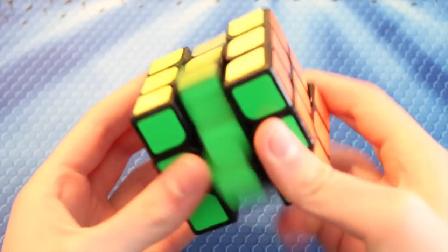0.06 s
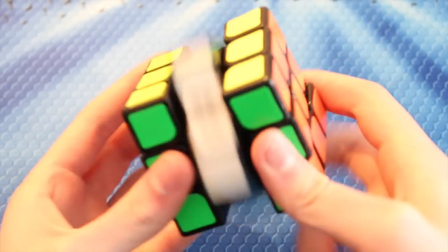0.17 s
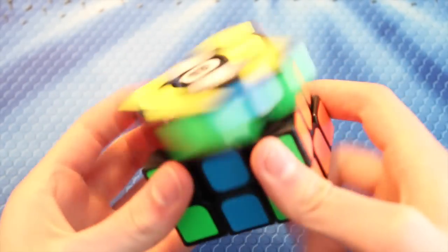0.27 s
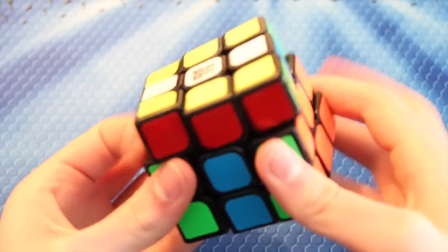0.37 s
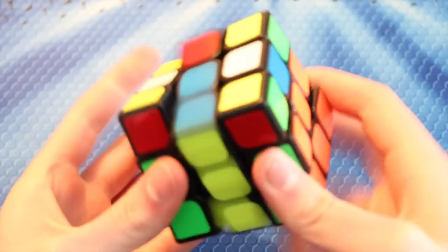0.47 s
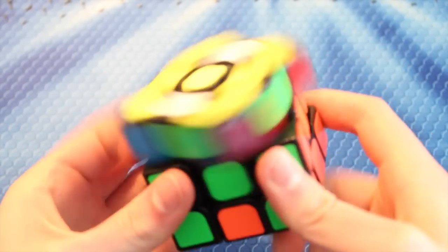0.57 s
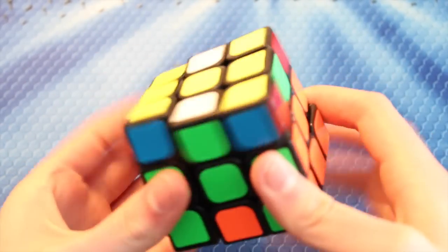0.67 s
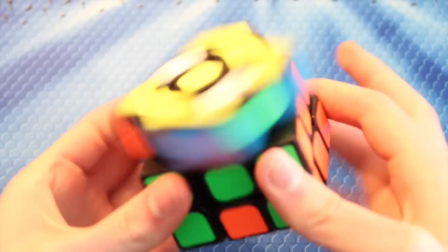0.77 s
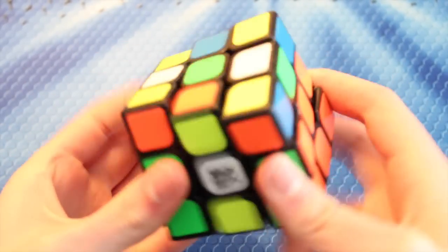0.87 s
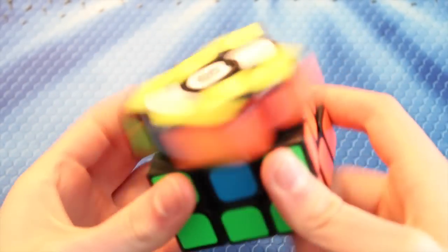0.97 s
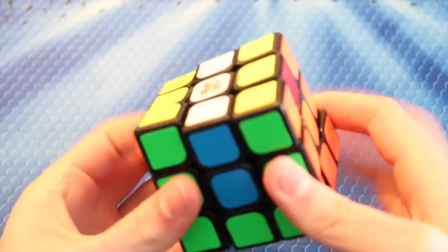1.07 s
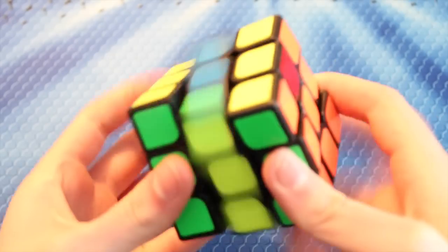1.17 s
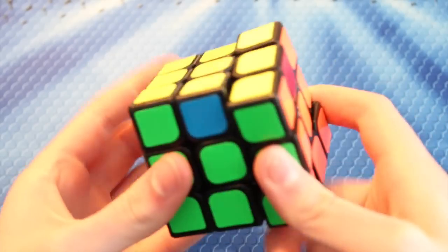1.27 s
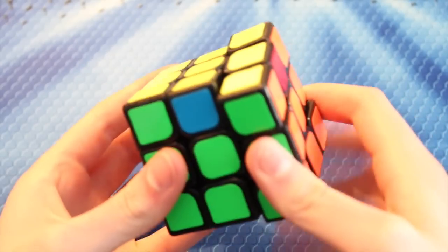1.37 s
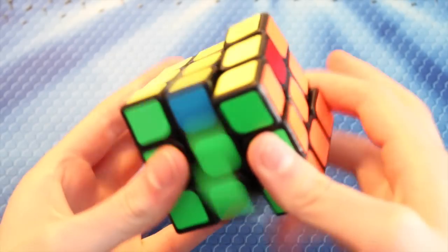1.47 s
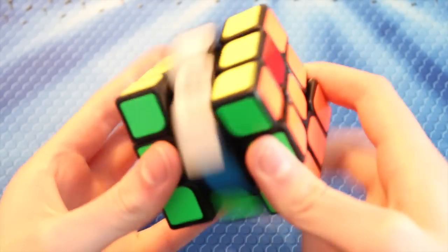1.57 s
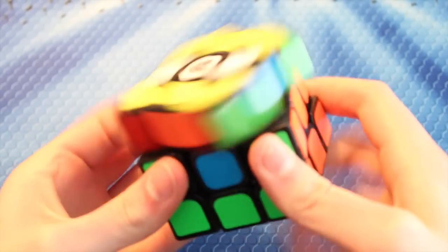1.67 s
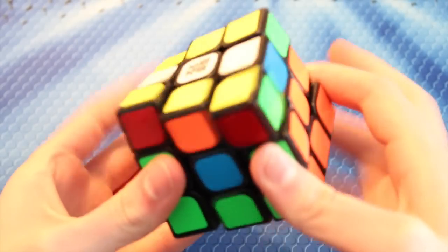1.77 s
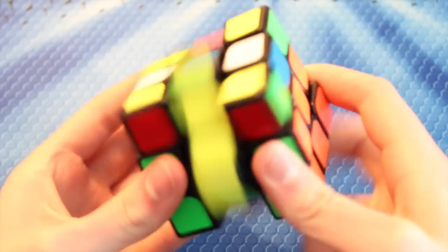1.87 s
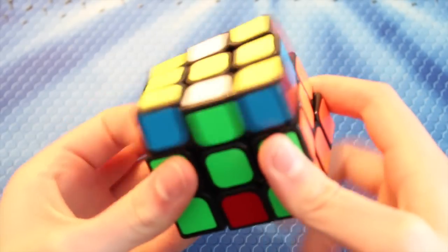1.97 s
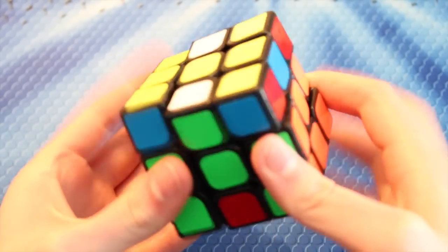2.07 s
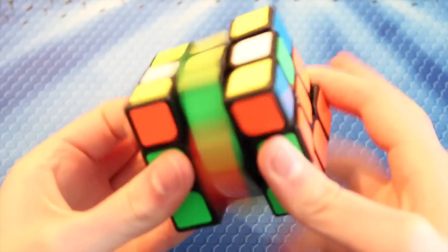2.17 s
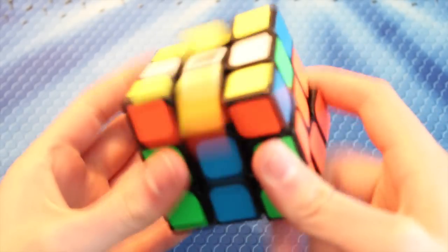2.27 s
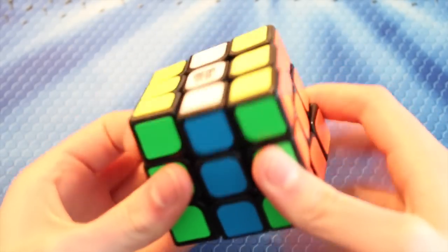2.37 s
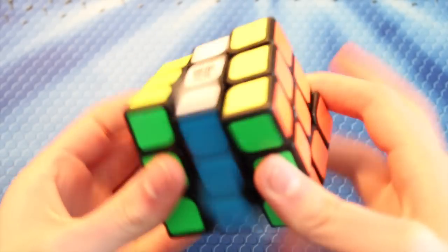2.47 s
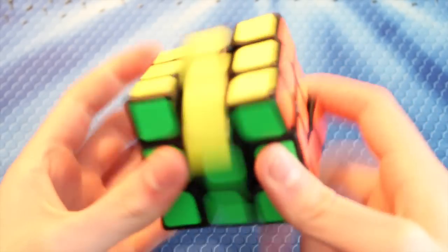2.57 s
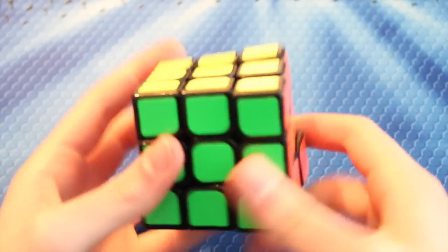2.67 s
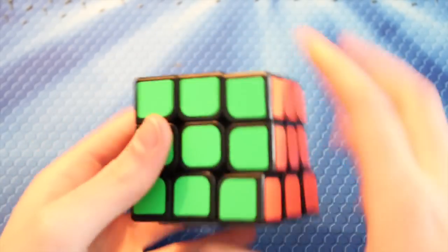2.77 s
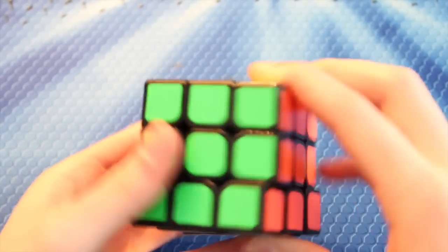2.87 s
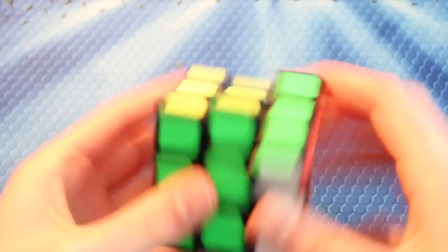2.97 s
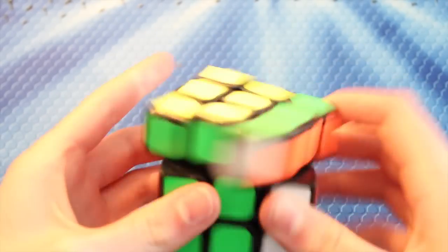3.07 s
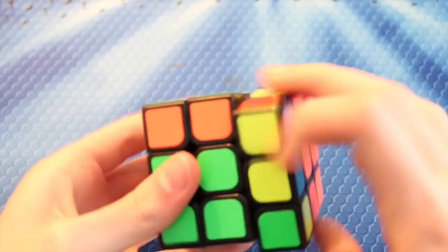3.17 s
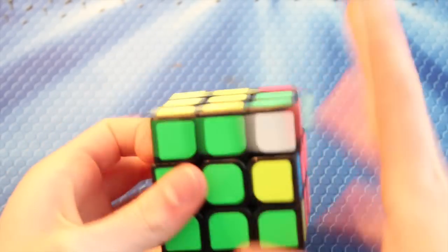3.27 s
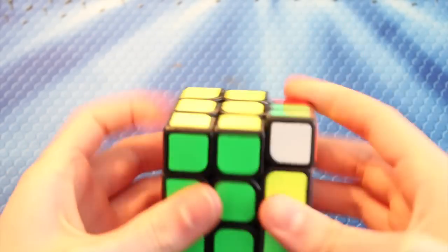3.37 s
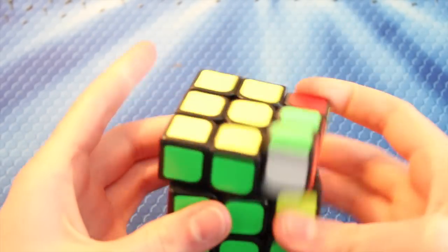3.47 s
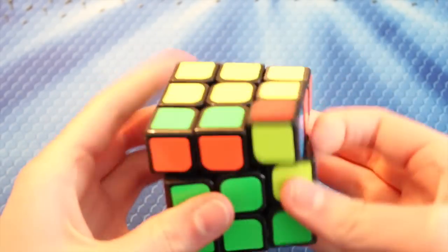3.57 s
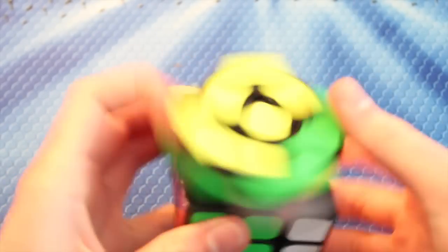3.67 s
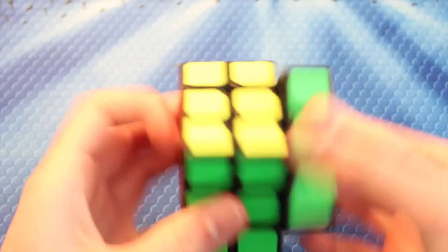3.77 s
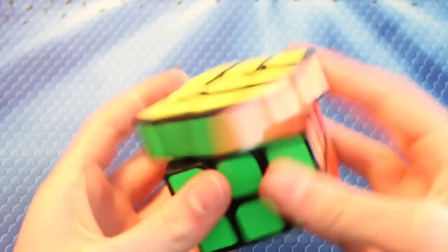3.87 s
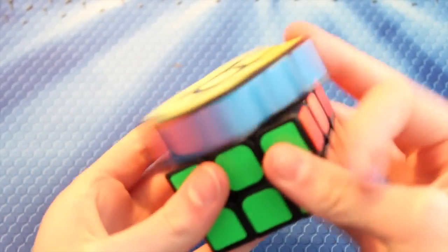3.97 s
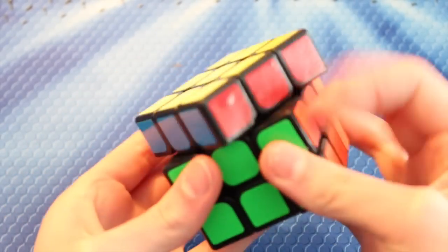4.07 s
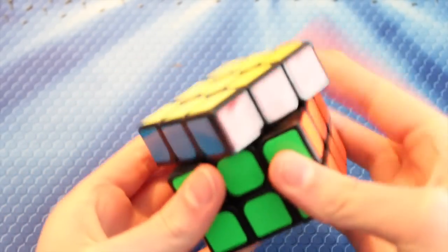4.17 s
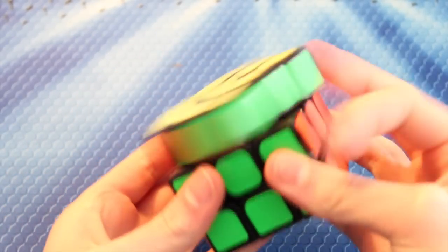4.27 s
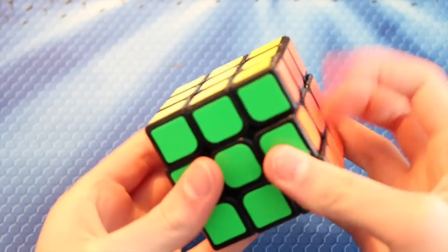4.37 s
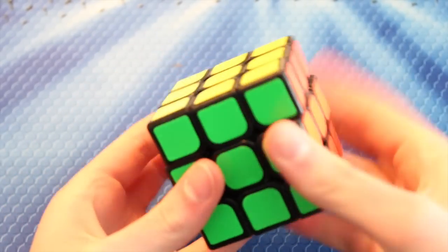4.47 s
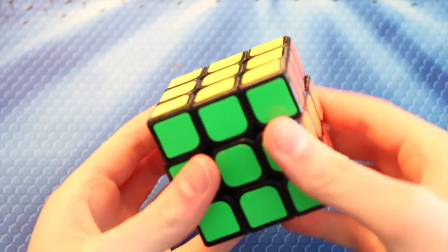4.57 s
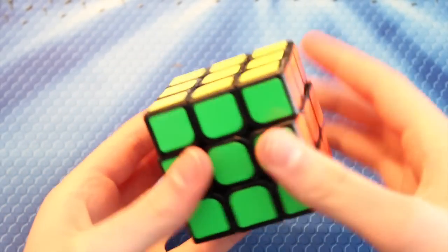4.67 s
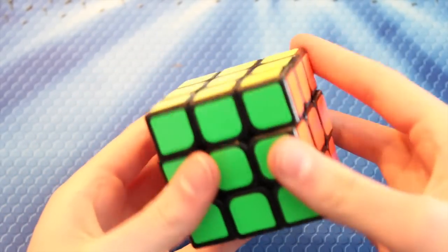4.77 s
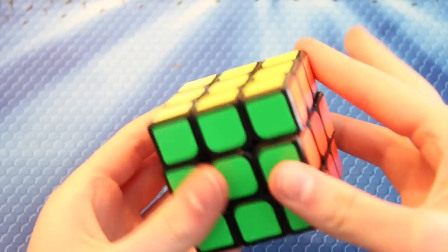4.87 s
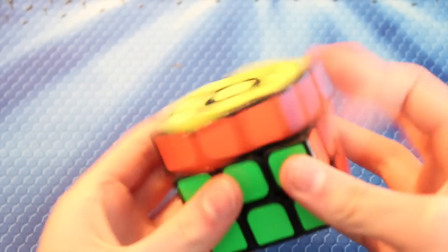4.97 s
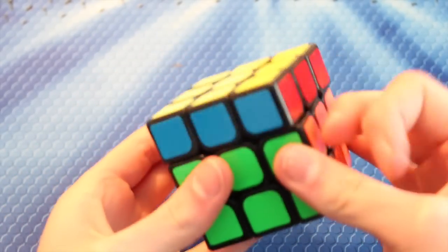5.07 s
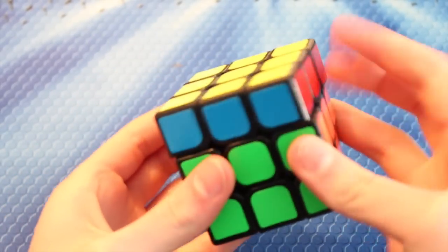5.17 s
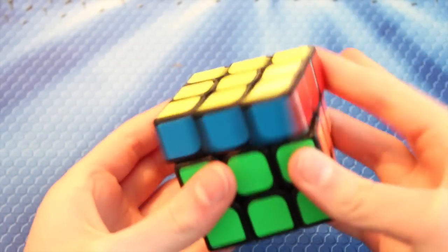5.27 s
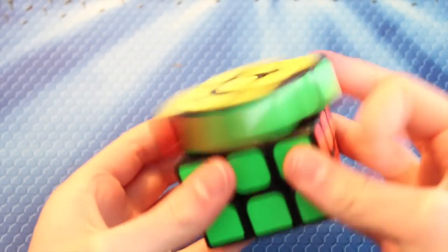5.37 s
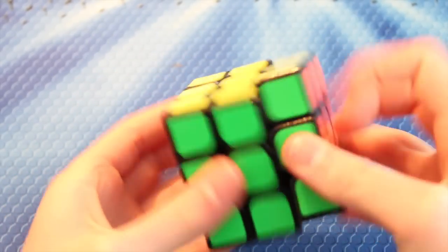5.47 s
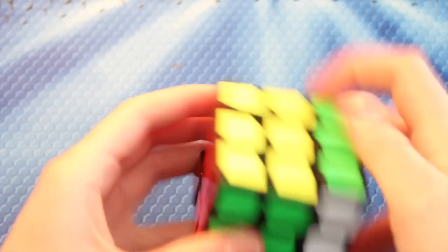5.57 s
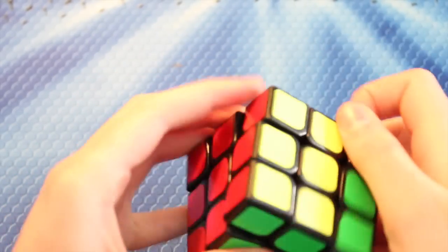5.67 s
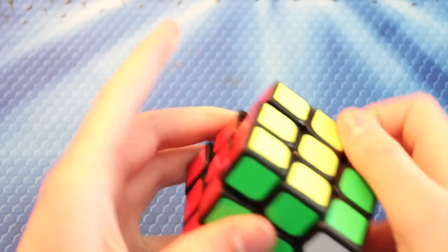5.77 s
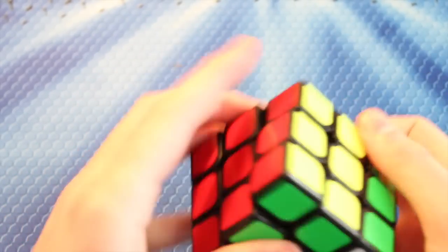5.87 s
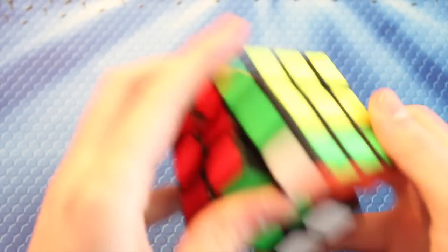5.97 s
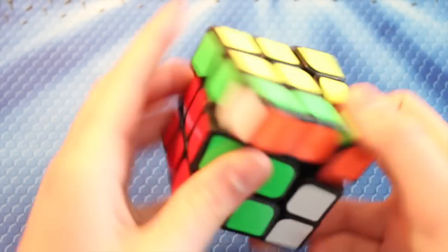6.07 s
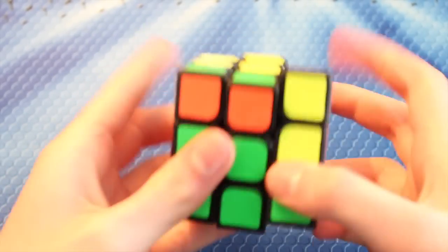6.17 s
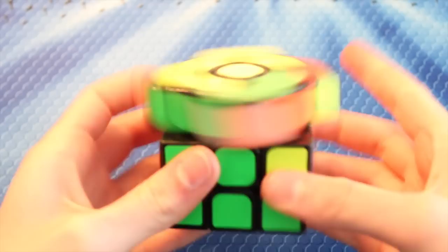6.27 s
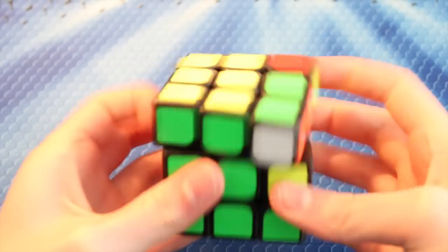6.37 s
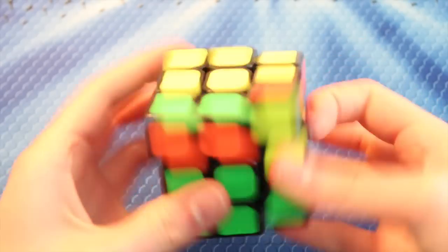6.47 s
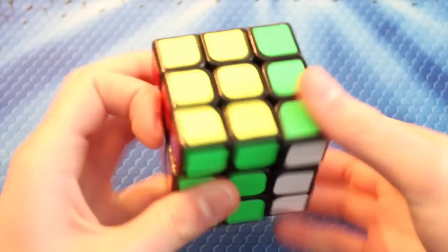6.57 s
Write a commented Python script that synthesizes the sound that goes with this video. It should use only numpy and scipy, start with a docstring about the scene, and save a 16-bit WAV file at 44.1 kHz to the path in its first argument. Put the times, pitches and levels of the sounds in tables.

```python
"""A faint hiss and a low rumble fill a small room. Almost at once, two hands start turning a plastic
puzzle cube close by, in quick runs. With each push the layers grind over each other, then pieces catch
and snap home in clusters of knocks. The hollow cube colours both sounds, and hands, table and walls
throw back a brief tail. After about 4.5 seconds the hands pause for half a second, then turn some more."""
import sys
import numpy as np
from scipy import signal
from scipy.fft import rfft, irfft
from scipy.io import wavfile
from scipy.ndimage import uniform_filter1d, minimum_filter1d

SR = 44100
rng = np.random.default_rng(int(sys.argv[2]) if len(sys.argv) > 2 else 0)


def persist_wave(psi):
    """Save psi, clipped to +-1, as 16-bit WAV."""
    counts = np.round(np.clip(psi, -1, 1) * 32767).astype(np.int16)
    wavfile.write(sys.argv[1], SR, np.atleast_2d(counts).T)


N = 292383


def amp(db):
    """Turn decibels into a gain."""
    return 10 ** (np.asarray(db) / 20)


def unit_level(x):
    """Scale a signal to an average (rms) level of 1."""
    return x / np.sqrt(np.mean(x ** 2) + 1e-20)


def curve_at(points, hz):
    """Join points with straight lines, with frequency spaced in octaves."""
    f, value = np.transpose(points)
    return np.interp(np.log(hz + 1), np.log(f + 1), value)


def gain_over_time(points):
    """A gain that glides between points given in seconds and dB."""
    return amp(np.interp(np.arange(N) / SR, *np.transpose(points)))


# The tone of the hiss. Each row: frequency in Hz, relative level in dB.
HISS_TONE = [(25, -32), (45, -9.5), (60, -2), (80, -8), (150, -5), (350, -8), (670, -5.5), (1000, -5.5),
             (4400, -14), (8000, -14), (14400, -25), (16000, -30.5)]
# The hiss grows a little as the turning calms. Each row: time in seconds, level change in dB.
HISS_SWELL = [(4.2, -0.5), (4.6, 0.5)]


def hiss(level_db=-68, uneven_db=1.2):
    """Steady room and microphone noise, slightly patchy in time and pitch."""
    frames, hz = N // 256 + 5, np.fft.rfftfreq(1024, 1 / SR)
    real, imag, patches = rng.standard_normal((frames, 513, 3)).T
    patches = unit_level(uniform_filter1d(uniform_filter1d(patches, 10, axis=0), 16, axis=1))
    spectrum = (real + 1j * imag) * amp(curve_at(HISS_TONE, hz)[:, None] + uneven_db * patches)
    noise = signal.istft(spectrum, nperseg=1024, noverlap=768)[1][:N]
    return amp(level_db) * unit_level(noise) * gain_over_time(HISS_SWELL)


# How loud the house murmurs. Each row: time in seconds, level in dB.
RUMBLE_LEVELS = [(0., -72), (1.3, -91.5), (2.2, -89.5), (3.0, -73.5), (3.5, -93), (4.3, -84), (4.7, -75),
                 (5.7, -72), (6.1, -74.5), (6.63, -81)]


def rumble(band_hz=(125, 274)):
    """The house murmurs: low noise whose level drifts."""
    band = signal.butter(2, band_hz, "bandpass", fs=SR, output="sos")
    return unit_level(signal.sosfilt(band, rng.standard_normal(N))) * gain_over_time(RUMBLE_LEVELS)


# Finger pushes on a layer, and near 2.82 s a finger brushing lightly over the cube. Each row: start in seconds,
# rise in seconds, hold in seconds, level in dB, then the low boom and the bright edge, both in dB compared with
# the cube's body band.
PUSHES = [(.04,0.036,.005,-69,-20,-6),(0.155,0.0085,.02,-42,-9,-14),(0.181,0.018,0.025,-29,-3.5,-6),(0.24,0.018,0.023,-31,-5,-8),(0.275,0.014,.01,-28,-7.5,-7),(0.342,0.012,.04,-45,-2,-15.5),(0.372,.022,0.013,-28.5,-8,-3),(.43,.01,0.026,-47.5,-15.5,-17),(.48,.01,.005,-48,-17,-13),(0.516,0.027,0.14,-33,-6,-6.5),(0.592,0.048,0.056,-31,-11.5,-11.5),(0.727,.02,0.053,-49.5,-15.5,-11.5),(0.84,0.035,0.017,-33,-10.5,-8.5),(.884,0.011,0.015,-22.5,-9,-10.5),(0.921,0.02,.005,-31.5,-0.5,-8),(0.996,0.013,0.021,-26.5,-6.5,-7.5),(1.042,0.024,0.037,-31,-9.5,-7),(1.236,0.013,.01,-36,-8.5,-11),(1.252,.01,0.026,-30.5,-9,-7),(1.291,0.027,0.019,-35,-2,1),(1.57,0.036,0.037,-33.5,-5.5,-6),(1.602,.02,0.058,-30.5,-7,-7),(1.684,0.011,0.018,-29,-4,-10),(1.748,0.041,.005,-27,-9.5,-8),(1.881,0.02,0.018,-36,-0.5,-11.5),(1.887,0.058,0.022,-30,-5,-9),(1.978,0.011,0.057,-25,-10,-5),(2.09,.01,.03,-64,-22,-10.5),(2.184,.008,.01,-50,-9,-16),(2.197,0.027,0.052,-30.5,-9,-8),(2.272,.02,0.023,-28,-9.5,-8),(2.322,0.039,.005,-27,-6,-8),(2.402,0.039,.005,-30,-5,-7),(2.583,0.0083,0.039,-31,-5.5,-8),(2.605,0.022,0.056,-31,-3.5,-5),(2.817,0.0092,.025,-63.5,-20,8),(2.839,0.0087,0.01,-62,-40,12),(2.913,0.0091,0.029,-59,-7.5,-23),(2.974,0.019,.005,-50,-3.5,-21),(3.024,0.0091,0.03,-42,-3.5,-22),(3.061,0.011,0.036,-33,-5.5,-12),(3.094,0.0068,.01,-38,-2,-22),(3.15,.01,.02,-50,-10,-15),(3.171,0.016,0.031,-32.5,-5.5,-8),(3.225,0.018,0.0046,-26.5,-6,-7),(3.309,0.0092,0.026,-43.5,1,-16),(3.345,.012,.02,-35.5,-6,-9),(3.45,0.009,.025,-66,-7,-16.5),(3.592,0.037,0.052,-39,-4.5,-9.5),(3.698,0.081,.005,-27.5,-2,-12),(3.862,.01,0.035,-38.5,-5.5,-11),(3.959,0.012,0.03,-44,-5,-11),(3.992,0.021,0.023,-31,-11,-7),(4.068,0.033,0.026,-33.5,-8.5,-12),(4.123,0.0089,0.033,-51,-6,-15),(4.194,0.0097,.01,-56,-6.5,3),(4.311,0.013,0.022,-39,-7,-9),(4.347,0.011,0.042,-30,-6.5,-8.5),(5.03,0.056,0.014,-32.5,-4.5,-8.5),(5.128,0.02,.005,-27.5,-5.5,-14),(5.393,.01,.015,-44,-3.5,-16),(5.409,0.022,0.06,-33.5,-4.5,-10),(5.458,0.047,0.0046,-30,-6.5,-10),(5.595,0.011,0.035,-41.5,-8,-22),(5.622,0.027,0.026,-32.5,-5.5,-8.5),(5.697,.01,0.047,-54.5,-1,-25),(5.79,.008,.03,-59,4.5,-23.5),(5.884,.03,0.04,-70.5,4.5,-15.5),(6.032,0.025,.01,-46,-4.5,-14),(6.057,0.015,0.0093,-29,-4.5,-10),(6.143,0.08,.005,-47.5,11,-18),(6.185,0.0081,0.046,-33,-8,-12),(6.343,.01,0.026,-38.5,-3.5,-20),(6.362,0.018,0.026,-30.5,-9,-9),(6.45,0.024,0.043,-41.5,-0.5,-10),(6.504,0.022,.005,-30,-1,-6),(6.586,0.011,.06,-36,-6.5,-8)]


def grind(catches_per_s=9000, ticks_per_s=120, tick_db=13, spread_db=2, clack_db=-4.5, wander_db=2):
    """Rough plastic faces slide past each other, making thousands of tiny catches. Near 2.82 s a finger brushes
    the cube, a faint and bright rub made the same way."""
    grip_s, grip_db = 0.0028, -15  # the faces bite at once, this far under the peak, then swell
    seat_s, seat_db = 0.008, -6  # the pressure drops as the layer settles in place
    coast_db_per_s, brake_db_per_s2 = 202, 1496  # then the layer slows ever faster
    dulling = 0.13  # dB of bright edge lost for each dB under the peak
    t = np.arange(N) / SR
    power, boom_power, edge_power = np.full((3, N), 1e-14)
    for start, rise, hold, db, boom, edge in PUSHES:
        span = slice(round(start * SR), round((start + rise + hold) * SR) + SR // 4)
        age = t[span] - start
        released = np.maximum(age - rise - hold, 0)
        shape_db = grip_db * np.maximum(1 - age / rise, 0)
        shape_db += seat_db * (1 - np.exp(-released / seat_s))
        shape_db -= coast_db_per_s * released + brake_db_per_s2 * released ** 2
        push = (amp(db + shape_db) * np.minimum(age / grip_s, 1)) ** 2
        power[span] += push
        boom_power[span] += push * amp(2 * boom)
        edge_power[span] += push * amp(2 * (edge + dulling * shape_db))
    boom_db, edge_db = 10 * np.log10(boom_power / power), 10 * np.log10(edge_power / power)
    when, size, sign = rng.random((3, N))
    catches = (when < catches_per_s / SR) * amp(-spread_db * np.log(size + .01)) * np.sign(sign - .5)
    catches *= np.where(when < ticks_per_s / SR, amp(tick_db), 1)  # some corners catch harder
    force = unit_level(catches) * uniform_filter1d(np.sqrt(power), 200)
    # The tone wanders as different pieces touch.
    wander = unit_level(uniform_filter1d(uniform_filter1d(rng.standard_normal(N), 900), 900))
    return hollow_cube(force, boom_db, clack_db + wander_db * wander, edge_db)


def tap_response(gain, size=2048):
    """The shortest sound with this spectrum that starts only when tapped (minimum phase)."""
    log_gain = np.log(np.maximum(np.concatenate([gain, gain[-2:0:-1]]), 1e-5))
    return np.fft.ifft(np.exp(signal.hilbert(log_gain).conj())).real[:size]


# The cube's broad tone, before each band gets its own level. Each row: frequency in Hz, level in dB.
CUBE_TONE = [(100, -55.5), (400, -20.5), (800, -15.5), (1400, -10), (2400, -10), (5000, -2), (7200, 4),
             (9500, -1.5), (13000, -4.5), (16000, -10.5)]
# Where the shell and its hollows ring. Each row: frequency in Hz, width in Hz, boost in dB.
SHELL_RINGS = [(695.6, 55, 10.5), (992, 177, 8.5), (1711, 130, 5), (1989, 26, 6.5), (2850, 1400, 8),
               (7450, 1300, 0)]


def hollow_cube(force, boom_db, clack_db, edge_db, split_hz=(2200, 5000, 9500)):
    """Contacts shake the shell, which sounds in four bands, low to high: boom, clack, body, edge."""
    lead = 128  # samples of room for each band to build up
    hz = np.fft.rfftfreq(4096, 1 / SR)
    rings_db = sum(db / (1 + (2 * (hz - f) / width) ** 2) for f, width, db in SHELL_RINGS)
    tap = tap_response(amp(curve_at(CUBE_TONE, hz) + rings_db))
    spectrum = rfft(np.pad(tap, (lead, 0)), 4096)
    below = [np.zeros_like(hz)] + [1 / (1 + (hz / f) ** 18) for f in split_hz] + [np.ones_like(hz)]
    fade = np.hanning(4096 + lead)[2048 - lead:4096 - lead]
    gains = amp(boom_db), amp(clack_db), 1, amp(edge_db)
    sound = np.zeros(len(force))
    for band, gain in zip(np.diff(below, axis=0), gains):
        response = irfft(spectrum * band)[:2048] * fade
        response /= np.linalg.norm(response)
        sound += signal.oaconvolve(force * gain, response)[lead:len(force) + lead]
    return sound


# Pieces knocking together. Each row: start in seconds, level in dB, hollow clack in dB compared with
# the body band, pitch of the struck piece in Hz, rattle length in milliseconds.
PIECE_KNOCKS = [(0.091,-61.5,-3,4600,4.9),(0.163,-46,-13,7190,7.6),(0.1881,-28.5,-6.5,7940,14),(.2064,-25,0.5,7190,4.6),(0.2394,-22,-6,7200,5.5),(0.2606,-28.5,2,7360,3.1),(0.267,-20.5,-2.5,2850,4.5),(0.3073,-16,-4.5,3500,3.9),(0.3437,-36.5,3,2130,1.7),(.3756,-40,-22,7400,17),(0.3816,-25,-8,8450,7.7),(.4045,-24,3,7500,6.7),(0.4108,-13.5,-7,7100,1.6),(0.5107,-38,-3,4390,2.7),(0.5212,-35,4,7190,1.2),(0.5269,-26,-3,1730,11),(0.5627,-24,-5.5,7240,6),(0.5979,-18.5,-7,7640,4.4),(0.6077,-21.5,0.5,6560,2.5),(0.6199,-20.5,-5,8800,17),(.6447,-17.5,-2.5,7700,2.5),(0.671,-23,-3,3880,4.7),(.6887,-18.5,-8,7800,5.4),(.75,-32.5,-6,7280,2.8),(0.7777,-33.5,-7,7800,5.7),(.8467,-44.5,0,7880,11),(.8696,-43,3,6930,5.5),(0.8919,-17.5,-13,7660,9.6),(0.9438,-15.5,-5,3780,4.9),(0.9622,-22.5,-12,8500,4.2),(0.981,-25.5,-3.5,8040,4.4),(1.009,-31,1.5,1050,3.5),(1.0418,-21,-8.5,7760,2.2),(1.0719,-23.5,-8,6980,1.8),(1.1043,-27,-4.5,8260,8),(1.2312,-38.5,-6,8700,3.3),(1.293,-38,3,6500,7),(1.304,-25.5,-1.5,7440,6.1),(1.3142,-19,-1,7850,1.4),(1.325,-22.5,-3.5,6700,6.3),(1.3463,-20.5,-4.5,7680,4.2),(1.5793,-47.5,-1,6970,6),(1.5894,-32,-2,6930,3),(1.628,-24,-2,6600,2.3),(1.6406,-18.5,-9.5,8750,1.5),(1.6607,-28.5,0,8000,12),(1.6707,-15,-4.5,7600,1.7),(1.6993,-20.5,-10.5,7400,5.7),(1.75,-26,-16,7000,1),(1.764,-28.5,-6.5,7300,16),(1.865,-32.5,-6,8100,5),(1.877,-32,0.5,3900,3.1),(1.8965,-34.5,-9,7200,20),(1.9191,-23.5,-2,6200,3.4),(1.9682,-22.5,-3.5,7070,4.1),(1.9772,-19.5,-3.5,8920,8.7),(2.017,-17.5,-7,7670,1.9),(2.123,-38,-8.5,6360,8.4),(2.198,-38,-3,5170,5.2),(2.217,-32.5,-5.5,6100,10),(2.2547,-23.5,-5.5,7400,5.4),(2.2926,-17,-10.5,6700,4.4),(2.335,-31,-1,6800,5.9),(2.3497,-20,-1.5,8050,2.7),(2.3793,-16.5,-5.5,8460,3.1),(2.4019,-29.5,0,1110,3.6),(2.434,-24,-12,7800,2.6),(2.45,-20,-6,6760,5.6),(2.5762,-38,-3,7150,2.7),(2.5926,-31,-3.5,7200,15),(2.6317,-13.5,-7.5,8000,1.3),(2.6459,-48,14,3580,7),(2.6562,-15.5,-3,2880,5.1),(2.6694,-23,-4.5,8200,15),(2.9253,-49,-15,7840,7),(2.993,-46,5,2660,1.7),(3.024,-39,5,2780,4.9),(3.0635,-27,-7.5,2860,9.8),(3.1,-17.5,-1.5,7700,5.6),(3.1816,-26.5,0,8340,1.6),(3.2252,-24.5,-7.5,7850,11),(3.276,-27.5,0.5,4000,3.4),(3.3175,-45.5,3.5,1080,7),(3.451,-48,-5,6700,8.4),(3.5473,-59.5,5,1064,4.6),(3.607,-37.5,-6.5,6700,12),(3.6492,-27,-5,2900,7.4),(3.7054,-29.5,-2.5,7490,3),(3.723,-27.5,-6,5900,4.5),(3.7387,-25.5,-6,6860,12),(3.768,-22,-12,7240,2.4),(3.782,-27,-9,6700,5.4),(3.8088,-31,-3,6000,4),(3.8559,-38,-4,3800,7.6),(3.8649,-30.5,1.5,2900,2.9),(4.001,-28.5,-4,3100,4.6),(4.0191,-33,-4,6160,6.1),(4.032,-31.5,5.5,2800,6.7),(4.0823,-35,-5,6900,22),(4.0983,-27.5,-6,6540,10.6),(4.2012,-35.5,-6.5,8100,4),(4.219,-52,7,1860,12),(4.2294,-38,2,1770,1.5),(4.2906,-59,-1,6720,9.8),(4.3103,-39,-7,7410,3),(4.3315,-36.5,-3,7400,9),(4.349,-28.5,-6,6550,12),(4.5144,-33,-6.5,1820,1.7),(4.594,-57,-6,7020,13),(4.6153,-57.5,-4.5,7340,9),(4.8668,-69,6,2790,5.6),(4.9308,-68,-8,5680,7),(5.0395,-44,-2,6040,7),(5.0842,-35.5,3.5,7920,12),(5.1163,-30,-2,7250,11.5),(5.1356,-26.5,-2.5,6870,7.1),(5.362,-66,19,1790,5.6),(5.3884,-45.5,0,5470,10),(5.4202,-26,-5.5,7340,4.6),(5.4409,-23.5,-1.5,7000,3.8),(5.487,-26,-3.5,7100,3.1),(5.5914,-38,7.5,1030,3.8),(5.6582,-30,0,1950,1.7),(5.7008,-41.5,3.5,7650,6.1),(5.7529,-51,9.5,1960,9.5),(5.7754,-39.5,5,3000,4.3),(5.8037,-32.5,1,6400,4.6),(5.978,-64.5,0,3550,3.9),(6.0439,-58,9,2890,3.5),(6.0716,-23,-3,6200,7.1),(6.1575,-42.5,4,3000,9.4),(6.183,-30.5,3,6060,4),(6.2297,-22.5,-2,2920,4.1),(6.2411,-32,1,6800,8.1),(6.321,-49,2,2070,7),(6.334,-30,4.5,3530,3.8),(6.378,-39,2.5,7350,24),(6.4058,-24.5,-5,6750,7.5),(6.4668,-39,-1,4000,5.9),(6.4782,-36,-4,7360,20),(6.5087,-32.5,1,1590,3),(6.5211,-28.5,-6,6600,18),(6.5825,-39,3.5,1710,13),(6.6108,-33.5,-1,6680,4)]


def knocks(taps_per_s=9000, spread_db=3.5, fade_db=8.5, crack_db=6.5, crack_s=5e-5, ring_db=-14):
    """Pieces snap home with a sharp crack and a dying rattle, and the struck piece rings briefly."""
    force, ring, boom_db, clack_db, edge_db = np.zeros((5, N + 1600))
    t = (np.arange(1600) - 220) / SR  # starts 5 ms before the pieces meet
    ring_t, since_hit = t[220:620], np.maximum(t, 0)
    for start, db, clack, hz, rattle_ms in PIECE_KNOCKS:
        span = round((start + t[0]) * SR) + np.arange(len(t))
        rattle_s = rattle_ms / 1000
        when, size, sign = rng.random((3, len(t)))
        direction = np.sign(sign - .5)
        taps = (when < taps_per_s / SR) * amp(-spread_db * np.log(size + .03)) * direction
        # Small contacts swell just before the hit (less for light knocks), then die away.
        swell_db = -9.5 + 0.03 * (db + 20) + 3500 * t
        taps *= amp(np.where(t < 0, swell_db, -fade_db * since_hit / rattle_s))
        taps /= np.sqrt(np.mean(taps[(t >= 0) & (t < rattle_s)] ** 2) + 1e-9)
        taps += amp(crack_db) * direction * np.exp(-since_hit / crack_s) * (t >= 0)  # edges meet first
        force[span] += amp(db) * taps

        width_hz = 69 + 0.059 * hz  # higher rings die sooner
        tone = np.exp(-np.pi * width_hz * ring_t) * np.sin(2 * np.pi * hz * ring_t)
        tone = np.diff(tone, prepend=0)  # a small piece gives off no bass
        tone /= np.linalg.norm(tone)
        hollow_db = max(0, clack) + 10 * max(np.log2(2800 / hz), 0)  # low shell rings carry better
        ring[span] += amp(db + hollow_db) * np.convolve(taps, tone)[:len(t)]

        boom_db[span], clack_db[span] = clack - 5.5, clack
        # Harder, higher and less hollow knocks are brighter.
        edge_db[span] = -11 + 0.24 * (db + 25) + np.log2(hz / 7000) - 0.35 * clack
    return (hollow_cube(force, boom_db, clack_db, edge_db) + amp(ring_db) * ring)[:N]


# How long the reflections last. Each row: frequency in Hz, seconds to fade by 60 dB.
ROOM_FADE = [(400, 0.28), (1500, 0.25), (7300, 0.18), (14000, 0.085)]


def reflections(sound, level_db=-11.5, turn_s=0.09, count=4):
    """Sound bounces off hands, table and walls in a brief tail of echoes, treble dying first."""
    echoes = np.zeros((count, SR // 2))
    slots = np.arange(0, SR // 2 - 12, 12)  # one echo in every 12 samples
    arrivals = slots + rng.integers(0, 12, (count, len(slots)))
    np.put_along_axis(echoes, arrivals, rng.choice([-1., 1.], arrivals.shape), 1)
    hz, t, spectrum = signal.stft(echoes, SR, nperseg=128)
    fade = amp(-60 * t / curve_at(ROOM_FADE, hz)[:, None])
    tails = signal.istft(spectrum * fade, SR, nperseg=128)[1]
    tails /= np.linalg.norm(tails, axis=1)[:, None]
    tails = np.pad(tails, ((0, 0), (45, 0)))  # 1 ms of travel
    # Four echo tails fade in and out in turn, so the reflections keep changing colour.
    cycle = (np.arange(N) / SR / turn_s - np.arange(count)[:, None]) % count
    share = np.sin(np.pi / 2 * np.minimum(cycle, 2))
    return amp(level_db) * signal.fftconvolve(sound * share, tails, axes=1).sum(0)[:N]


def scene():
    """The quiet room, the cube and its reflections, in one channel."""
    background = hiss() + rumble()
    bass_cut = signal.butter(4, 260, "highpass", fs=SR, output="sos")  # the cube is too small for bass
    cube = signal.sosfilt(bass_cut, grind() + knocks())
    return (background + cube + reflections(cube))[None]


def record(dry, ceiling=0.88, top_hz=15800):
    """A fast limiter turns down the hardest snaps, then a filter removes the highest treble."""
    safe_gain = np.minimum(ceiling / (abs(dry) + 1e-9), 1)
    limited = dry * uniform_filter1d(minimum_filter1d(safe_gain, 61), 41)
    treble_cut = signal.firwin(511, top_hz, window=("kaiser", 9), fs=SR)
    return signal.oaconvolve(limited, treble_cut[None], "same")


dry = scene()
out = record(dry)
persist_wave(out)
```